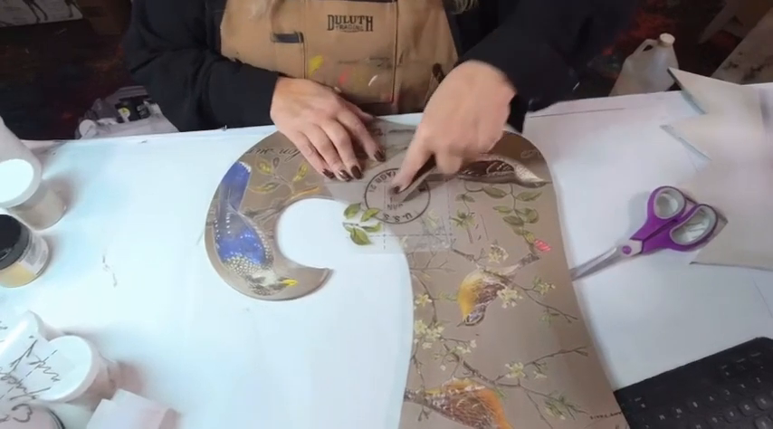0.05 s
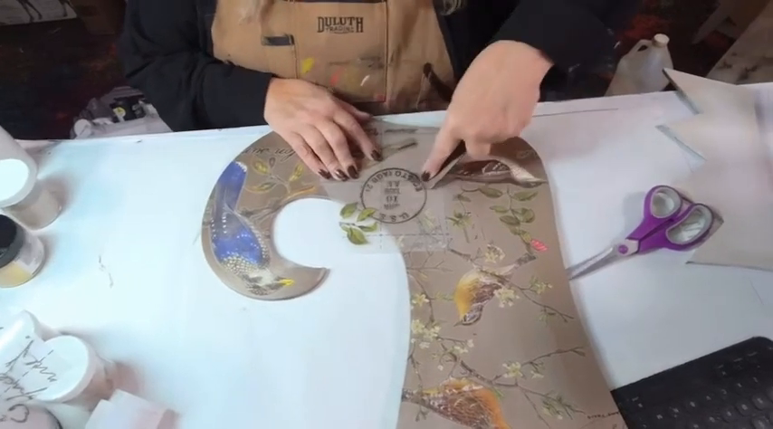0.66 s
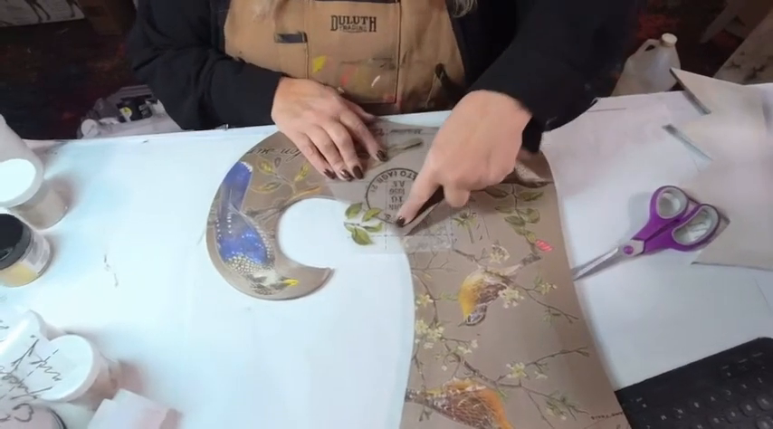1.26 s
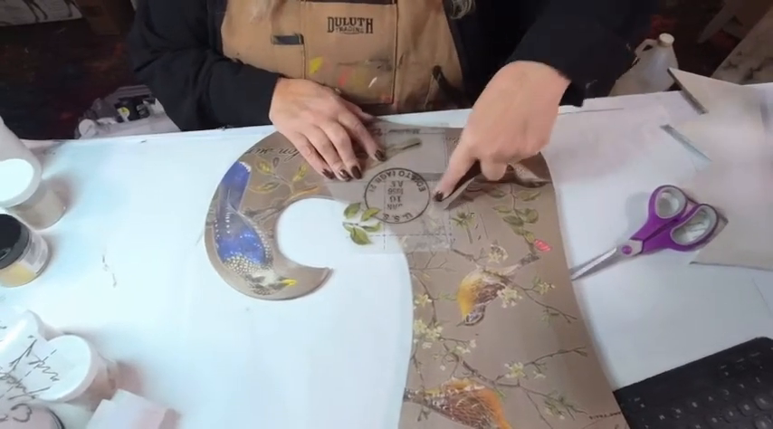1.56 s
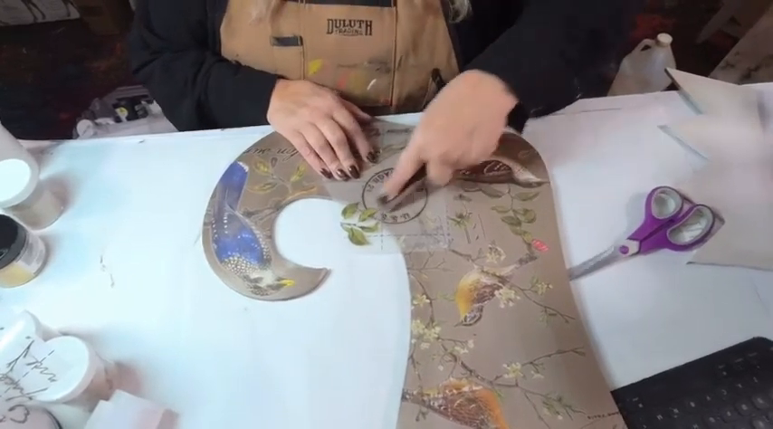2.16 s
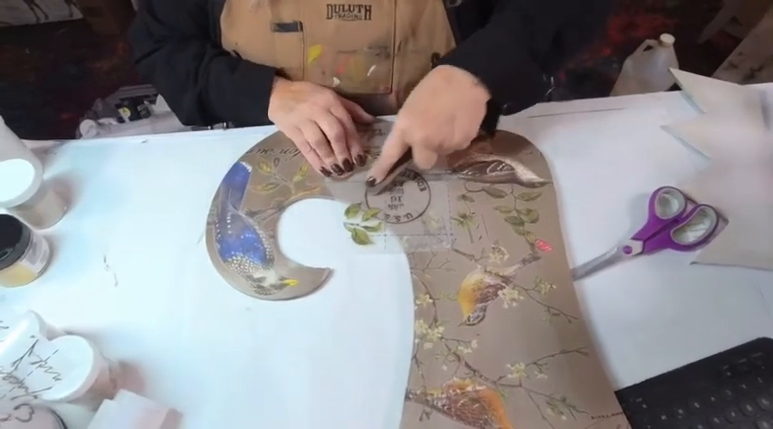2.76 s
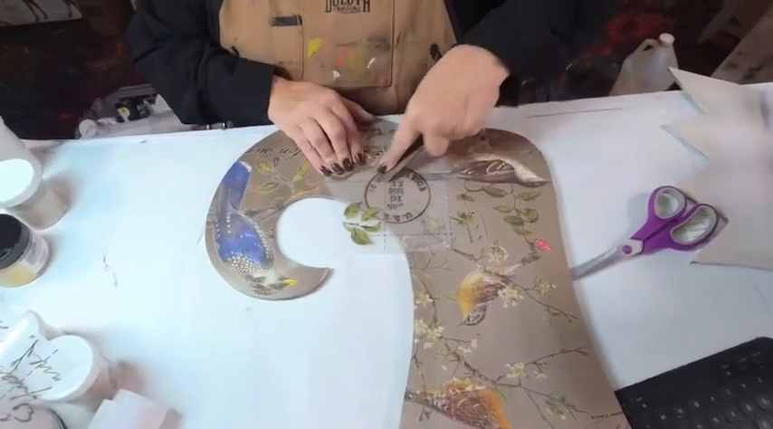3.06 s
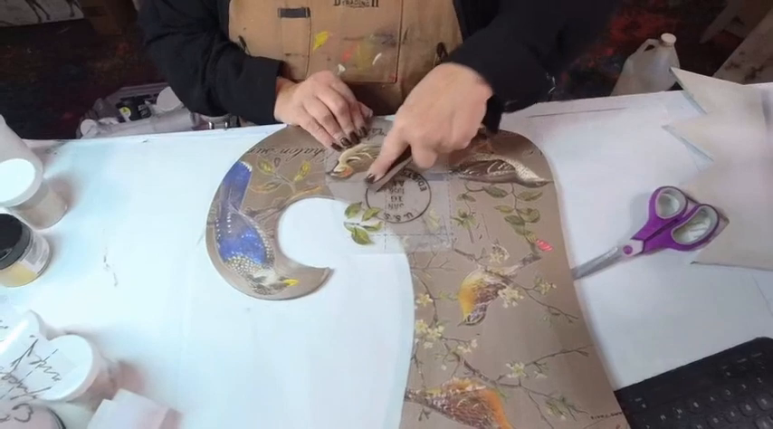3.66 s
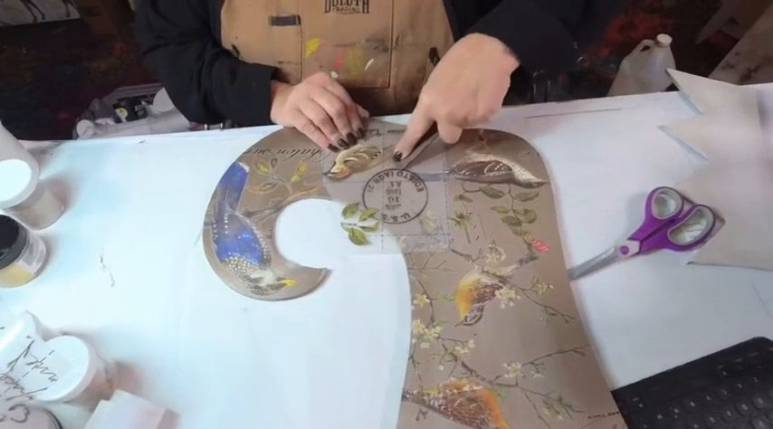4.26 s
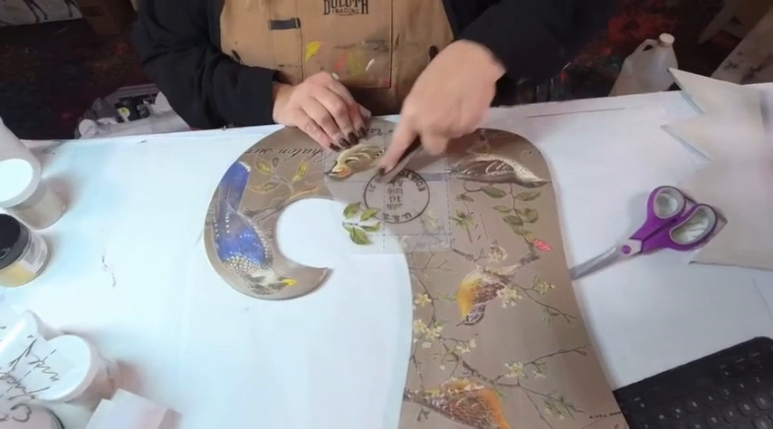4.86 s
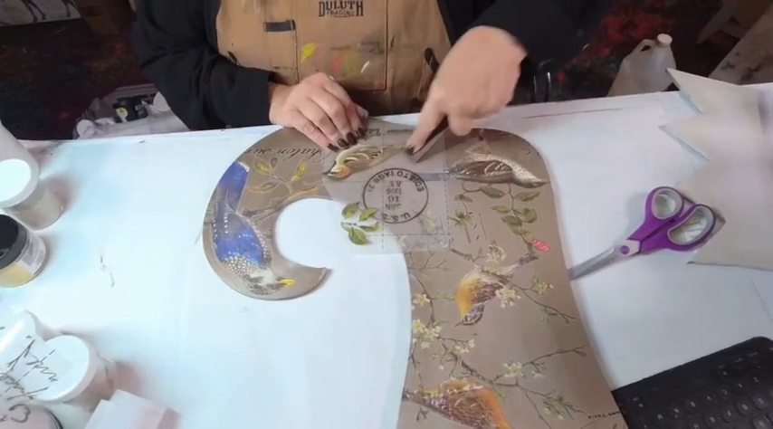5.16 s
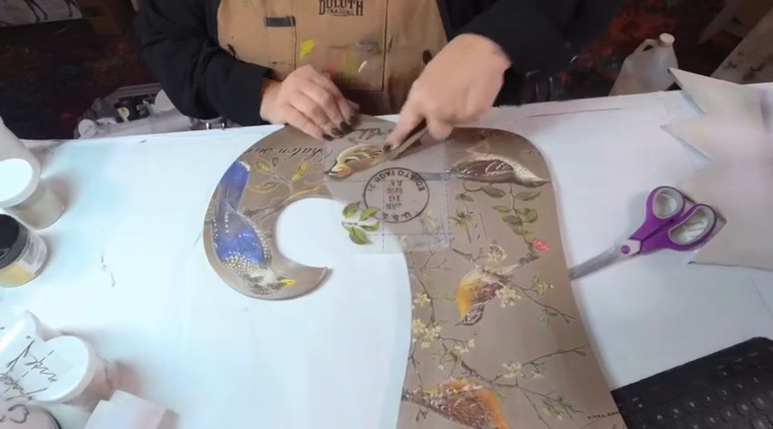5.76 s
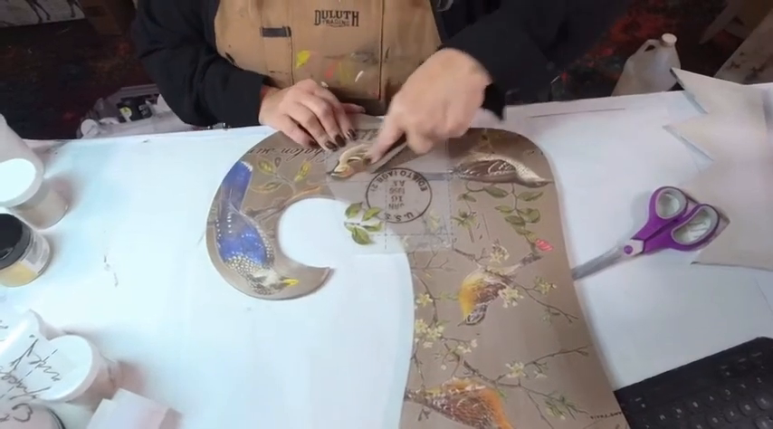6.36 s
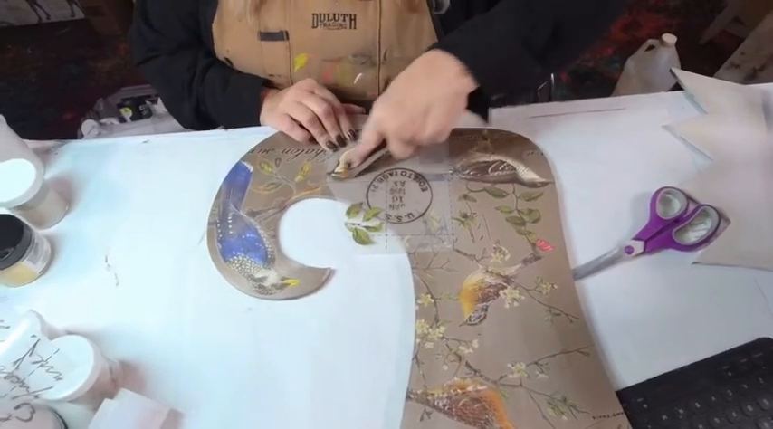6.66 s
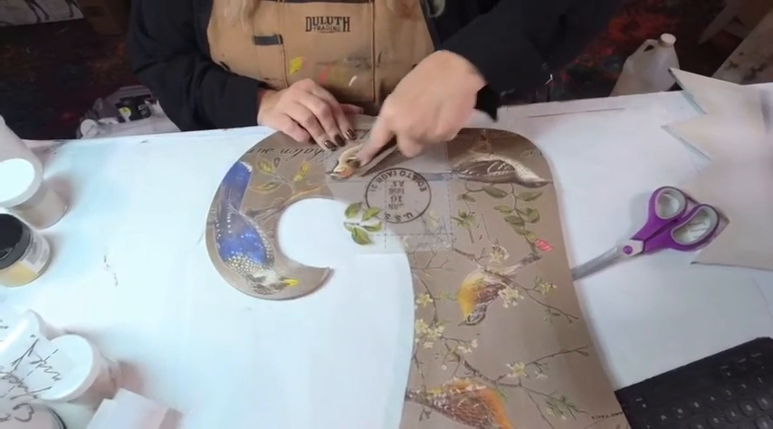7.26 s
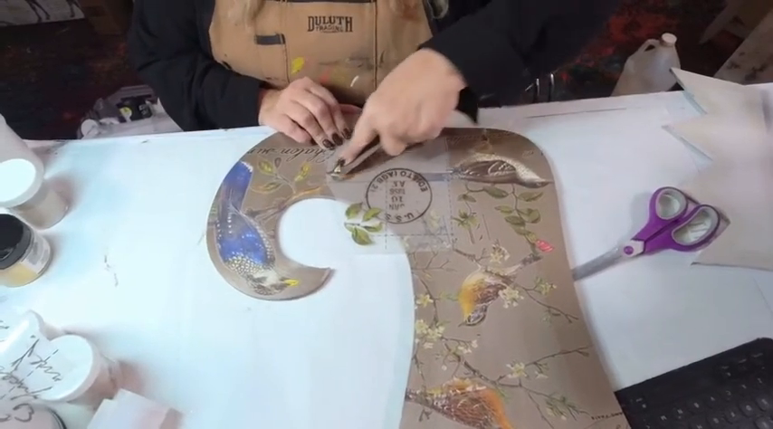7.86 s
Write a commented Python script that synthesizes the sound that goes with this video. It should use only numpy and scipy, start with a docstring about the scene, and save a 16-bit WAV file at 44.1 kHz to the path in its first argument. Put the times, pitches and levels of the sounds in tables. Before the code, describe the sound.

A small stick rubs a plastic sheet against a thin wooden board for the whole eight seconds, back and forth at about four strokes a second, slowing slightly after 5 seconds. Each stroke is a soft, bright, scratchy hiss with a rasp underneath. During the first two seconds the board also drums dully under the pressure. From about 1.7 to 1.9 seconds the sheet buckles in a cluster of crackles and sharp snaps, the loudest moment. The rubbing continues a little lighter, with faint ticks and small wooden taps, then firmer hissing strokes come around 5.4 and 6 seconds. Near 6.9 seconds the sheet crunches again with a sharp snap and a hollow pop, and the strokes carry on to the end. The sound is close and centred, in a small room with short reflections and a steady low ventilation hum.

```python
"""Burnishing a transfer sheet

A small stick rubs a plastic sheet onto a thin wooden board, back and forth, four strokes a second.
Stick-slip friction hisses on the film and drives the board's resonances, which rasp and drum.
Now and then the sheet buckles, and it crackles, snaps or pops.
A small room reflects these sounds, over a low steady hum."""
import sys
import numpy as np
from scipy import signal
from scipy.fft import rfft, irfft, next_fast_len
from scipy.io import wavfile
from scipy.ndimage import uniform_filter1d, map_coordinates

SR = 44100
rng = np.random.default_rng(int(sys.argv[2]) if len(sys.argv) > 2 else 0)


def output_pcm(signal):
    """Save a mono or channel-first signal as 16-bit PCM at the path in sys.argv[1].

    Samples are clipped to [-1, 1] before scaling.
    """
    pcm = np.clip(np.atleast_2d(signal).T, -1, 1) * 32767
    wavfile.write(sys.argv[1], SR, np.round(pcm).astype(np.int16))


N = 353682
TIME = np.arange(N) / SR

# The film's bright hiss. Each row: frequency in Hz, spectral density in dB.
HISS = [(3000, -40), (6500, -9.5), (7700, -4.5), (8500, 1.5), (9600, 0), (11000, 3), (13000, -1.5),
        (14500, -5.5), (15800, -25.5)]


def amp(db):
    """Amplitude ratio of a level in decibels."""
    return 10 ** (np.asarray(db) / 20)


def unit(x):
    """Normalisation to an rms of 1."""
    return x / np.sqrt(np.mean(x ** 2) + 1e-20)


def along(points, hz):
    """Interpolation of (Hz, value) points on a logarithmic frequency axis."""
    f, v = np.transpose(points)
    return np.interp(np.log(hz + 1), np.log(f + 1), v)


def curve(points):
    """Linear interpolation of (seconds, value) points, one value per sample."""
    return np.interp(TIME, *np.transpose(points))


def wobble(rate):
    """Smooth random modulation: a spline through rate knots a second."""
    return map_coordinates(rng.standard_normal(int(N * rate / SR) + 4), [TIME * rate])


def filtered(x, response):
    """Linear filtering: the spectrum of x times a frequency response."""
    size = next_fast_len(N + SR // 2)
    return irfft(rfft(x, size) * response(np.fft.rfftfreq(size, 1 / SR)), size)[..., :N]


def coloured(x, spectrum, size=16384):
    """Minimum-phase filtering: x excites a causal response of this spectrum and unit energy."""
    cepstrum = irfft(np.log(amp(along(spectrum, np.fft.rfftfreq(size, 1 / SR)))))
    cepstrum[1:size // 2] *= 2
    cepstrum[size // 2 + 1:] = 0
    ring = irfft(np.exp(rfft(cepstrum)))
    return signal.fftconvolve(x, ring / np.linalg.norm(ring))[:N]


def gliding(x, stretch):
    """Resampling multiplies every frequency of x by the factor stretch."""
    return map_coordinates(x, [np.cumsum(stretch)], order=1, mode="mirror")


def slips(rate, spread_db):
    """Stick-slip excitation: random impulses of uneven size, rate a second, at steady power."""
    jolts = (rng.random(N) < rate / SR) * rng.standard_normal(N) / np.sqrt(rate)
    return unit(jolts * amp(spread_db * rng.standard_normal(N)))


def wandering(x, stretch, depth_db, spacing_hz, rate):
    """A moving contact: each spot favours other frequencies, which glide by the factor stretch."""
    hz, t, spectra = signal.stft(x, SR, nperseg=1024)
    field = rng.standard_normal((400, 200))
    place = np.broadcast_arrays(hz[:, None] / (spacing_hz * np.interp(t, TIME, stretch)), t * rate)
    colour = amp(depth_db * map_coordinates(field, place, order=1, mode="mirror"))
    power = np.mean(np.abs(spectra) ** 2, axis=1)
    colour /= np.sqrt(power @ colour ** 2 / power.sum())  # the colour moves, the power stays
    return unit(signal.istft(spectra * colour, SR, nperseg=1024)[1][:N])


def through_board(x, direct):
    """Forced vibration: the board rings in its modes and passes the share direct straight on."""
    # The board's modes. Each row: frequency in Hz, bandwidth in Hz, peak gain in dB.
    modes = [(297.7, 10.5, 10.5), (359.3, 18, 3.5), (427, 3.6, 12.5), (559.3, 34, 4), (627, 72, -3.5),
             (725, 51, -1), (843, 75, -1.5), (994, 98, -7), (1014, 210, -6.5), (1260, 45, -2.5),
             (1548, 25, -24.5), (1770, 22, -11)]
    resonance = lambda f, hz, width: 1j * f * width / (hz * hz - f * f + 1j * f * width)
    response = lambda f: direct + sum(amp(db) * resonance(f, hz, width) for hz, width, db in modes)
    return filtered(x, response)


def rubbing():
    """Sliding friction: speed drives the hiss, pressure the board. Returns tip sound and drumming."""
    # Pull and push in turn. Each row: start and end in seconds, force in dB, drumming in dB,
    # place of the pressure crest along the stroke from 0 to 1.
    strokes = [(0, 0.18, -0.5, -3, 0.64), (0.219, 0.43, 4, 9.5, 0.52), (0.441, 0.637, 1.5, 2, 0.53),
               (0.669, 0.873, 0.5, 15, 0.58), (0.883, 1.094, -3, 0, 0.41), (1.093, 1.308, -2, 11.5, 0.54),
               (1.316, 1.508, -3, 2.5, 0.54), (1.553, 1.829, 2, 11, 0.41), (1.81, 2.045, -4, 1.5, 0.34),
               (2.053, 2.287, -1.5, 2, 0.59), (2.278, 2.5, -1.5, -11, 0.34), (2.538, 2.699, -3, -7, 0.58),
               (2.737, 2.92, -4, -8, 0.83), (2.975, 3.169, 1, 0, 0.41), (3.162, 3.411, 1, 1.5, 0.89),
               (3.404, 3.618, 0, 4.5, 0.35), (3.614, 3.819, -4, -5, 0.73), (3.848, 4.074, -1, 4, 0.48),
               (4.086, 4.293, -5, -0.5, 1), (4.315, 4.528, -0.5, 1.5, 0.42), (4.52, 4.742, -6.5, -6, 0.54),
               (4.769, 4.97, 0.5, 5.5, 0.4), (4.96, 5.327, -3, 4, 0.97), (5.32, 5.589, 5.5, -2, 0.39),
               (5.617, 5.889, 0, -3, 0.83), (5.927, 6.215, 4.5, 1, 0.36), (6.245, 6.509, 1, -24, 0.22),
               (6.536, 6.78, 3.5, -0.5, 0.35), (6.823, 7.084, -2, 0.5, 0.07),
               (7.145, 7.381, -1.5, -27, 0.43), (7.425, 7.674, -3.5, -8, 0.85), (7.699, 7.931, 5, -2, 0.42),
               (7.96, 8.21, -6, -1, 0.72)]
    # Friction spectra of film and board. Each row: frequency in Hz, spectral density in dB.
    film_spectrum = [(3000, -35), (4400, -12), (4950, -1.5), (5250, 1), (5650, -5), (6400, -11), (7500, -6),
                     (10000, -30)]
    scrape_spectrum = [(1300, -18), (1800, -9.5), (2350, -7.5), (2850, 3.5), (3400, 0), (3900, 2),
                       (4500, 1.5), (5400, -6.5), (8000, -38)]
    rasp_spectrum = [(400, -22.5), (700, -0.5), (900, 1.5), (1300, -4), (1600, -6.5), (2000, -4.5),
                     (3200, -23), (6000, -40)]
    drum_spectrum = [(100, -39), (200, 8), (300, 1), (560, 1), (700, -8.5), (1100, -22.5), (3000, -106)]
    # How coarse the surface is, and how freely the film rings. Each row: time in seconds, level in dB.
    coarseness = [(.3, 3), (1, 3), (1.9, 5.5), (2.2, 3.5), (2.65, 3), (3.05, -1.5), (3.33, 3.5), (3.6, -3),
                  (4.45, -3), (5.4, 1.5), (6.1, 0.5), (8, 1)]
    sheen = [(.3, 1), (.75, -2), (1, 4.5), (1.5, -6), (2.2, 1), (3, 2.5), (3.6, 0.5), (4.5, 1.5),
             (5.4, -1.5), (7.8, 1)]
    # The rasp's pitch at the spot being rubbed. Each row: time in seconds, frequency factor.
    rasp_pitch = [(0, 1.046), (1.3, 0.91), (2.2, 0.95), (3.3, 1.205), (4.2, 1.13), (5.4, 1.25), (6.1, 1.14),
                  (8, 1.16)]

    stroke = np.maximum(np.searchsorted(np.array(strokes)[:, 0], TIME) - 1, 0)
    start, end, force_db, board_db, crest = np.array(strokes)[stroke].T
    push = 2 * (stroke % 2) - 1  # +1 on a push, -1 on a pull
    phase = np.clip((TIME - start) / (end - start), 0, 1)
    speed = 0.0087 + np.tanh(1.9 * np.abs(np.sin(np.pi * phase)) ** 1.3)  # almost still at the turns
    speed_db = 20 * np.log10(speed)
    swell_db = 12 * np.tanh((crest - 0.38) / 0.17)  # a late crest swells the hiss, an early one fades it
    drive_db = speed_db + swell_db * (phase - .5)
    pressure_db = lambda peak: 0.43 * speed_db - 13 * (1 - np.exp(-((phase - peak) / 0.32) ** 2))
    coarse_db = curve(coarseness)
    hiss_db = -56 + force_db + drive_db
    film_db = -66.5 + force_db + 2.5 * push + curve(sheen) + drive_db
    scrape_db = -69 + 1.45 * force_db + coarse_db + drive_db
    rasp_db = -57.5 + force_db + 0.42 * board_db + 0.94 * coarse_db + pressure_db(crest)
    drum_db = -51.5 + board_db + pressure_db(crest + 0.11)  # peaks after the rasp: the stroke darkens

    stretch = 1 - .11 * push * (phase - .5)  # resonances sink along a push and rise along a pull
    friction = lambda spectrum: coloured(slips(2500 + 12000 * speed, spread_db=1.2), spectrum)
    hiss = wandering(friction(HISS), stretch ** .5, depth_db=5, spacing_hz=260, rate=18)
    film = wandering(friction(film_spectrum), stretch ** .3, depth_db=6, spacing_hz=190, rate=12)
    scrape = wandering(friction(scrape_spectrum), stretch, depth_db=8.5, spacing_hz=190, rate=11)
    rasp = gliding(friction(rasp_spectrum), curve(rasp_pitch) * stretch ** 2)
    rasp = through_board(rasp, direct=0.079)
    rasp = wandering(rasp, stretch, depth_db=9, spacing_hz=90.55, rate=13)
    drum = through_board(friction(drum_spectrum), direct=0.17)
    drum = wandering(drum, stretch, depth_db=7, spacing_hz=59.9, rate=16)

    grain_db = wobble(40) + 0.17 * wobble(270)  # the paint is not quite smooth
    gain = lambda db: uniform_filter1d(amp(db), size=500)
    tip = gain(hiss_db) * hiss + gain(film_db) * film + gain(scrape_db) * scrape + gain(rasp_db) * rasp
    return tip * amp(grain_db), gain(drum_db) * drum


def background():
    """Ambient noise: ventilation rumble, mains hum and faint room noise in antiphase at the ears."""
    # The rumble's strength. Each row: time in seconds, level in dB.
    rumble_levels = [(0, -44), (1.2, -46.5), (3.6, -48), (4.8, -50), (5.7, -49.5), (6.6, -46.5), (8, -49.5)]
    # Ventilation and room noise. Each row: frequency in Hz, spectral density in dB.
    rumble_spectrum = [(20, -45.5), (31, -32.5), (41, -10.5), (49, -30.5), (64, -9.5), (85, -3), (100, -2),
                       (116, 6), (135, -8.5), (157, 1), (175, -8.5), (230, -20), (500, -19.5), (900, -44.5),
                       (3000, -48.5), (12000, -52.5)]
    diffuse_spectrum = [(30, -11), (150, -12), (500, 4), (1400, -7), (3000, -5.5), (5500, -9.5),
                        (9000, -55)]
    rumble = amp(curve(rumble_levels)) * unit(coloured(rng.standard_normal(N), rumble_spectrum))
    mains = amp(-59 + 1.7 * wobble(5.3)) * np.sin(2 * np.pi * 120 * TIME)
    diffuse = amp(-83.5) * unit(coloured(rng.standard_normal(N), diffuse_spectrum))
    return rumble + mains + np.array([diffuse, -diffuse])


def snags():
    """Buckling: the tip catches and crumples the sheet, a dull crunch with bright crackle on top."""
    # The catches. Each row: start and end in seconds, level in dB.
    catches = [(0.024, 0.126, -70), (0.717, 0.784, -55), (1.704, 1.748, -39), (1.764, 1.79, -48.5),
               (1.81, 1.862, -50.5), (1.854, 1.899, -48.5), (2.175, 2.273, -64), (2.328, 2.362, -58.5),
               (3.234, 3.255, -53.5), (3.352, 3.386, -57), (4.815, 4.86, -61.5), (5.383, 5.47, -60.5),
               (5.793, 5.833, -58.5), (6.837, 6.886, -37), (6.875, 6.894, -40)]
    # The crunch. Each row: frequency in Hz, spectral density in dB.
    crunch_spectrum = [(300, -16.5), (900, 4), (1300, -2.5), (1700, 6), (2150, 2.5), (2900, 6.5), (4400, 2),
                       (5900, 2), (8000, 3.5), (14000, -33)]
    gate = lambda start, end: np.clip(np.minimum(TIME - start, end - TIME) / .008, 0, 1)
    envelope = sum(amp(db) * gate(start, end) for start, end, db in catches)
    buckling = lambda spectrum: unit(coloured(slips(3600, spread_db=2.5), spectrum))
    return envelope * (buckling(crunch_spectrum) + amp(-3.5) * buckling(HISS))


def snaps_and_taps():
    """Impulsive excitation: each blow cracks the film and leaves the board's modes to decay freely."""
    # The sheet snaps. Each row: time in seconds, level in dB, thin tick relative to the snap in dB.
    sheet_snaps = [(0.046, -33.5, 1), (0.112, -38.5, 9), (0.7601, -34.5, 10), (0.7646, -37, 10),
                   (1.715, -27, -16), (1.772, -8.5, -15), (1.842, -26.5, 0), (1.8627, -4, -5),
                   (1.917, -38, 12), (2.18, -40, 7), (2.34, -30, -15), (5.258, -40.5, 5.5),
                   (5.382, -35.5, 14.5), (6.2616, -45, 14), (6.2657, -33, 18.5), (6.845, -26, 4),
                   (6.854, -15.5, -18), (6.871, -22, -10), (7.617, -39, 6)]
    # The tip bumps the board. Each row: time in seconds, level in dB, offset of the crack in dB.
    tip_taps = [(1.747, -17, -10), (3.017, -35, -16), (3.201, -41.5, -2.5), (3.923, -33.5, -3),
                (4.819, -38.5, -7), (5.401, -31.5, -1.5), (5.971, -38, -6), (6.735, -32.5, -11.5),
                (7.619, -33.5, -3)]
    # The struck board's modes. Each row: frequency in Hz, level in dB, 60 dB decay time in seconds.
    modes = [(305, -23, 0.047), (435, -21, 0.065), (555, -18.5, .03), (860, -1, 0.04), (960, -6, 0.042),
             (1076, -8, 0.037), (1296, -8.5, 0.033), (1430, -9.5, 0.0079)]
    # The snapping film. Each row: frequency in Hz, spectral density in dB.
    snap_spectrum = [(500, -16), (1400, -15.5), (2200, 2), (2900, -2.5), (4000, -5), (4700, 1.5),
                     (5250, 9.5), (7500, 2), (8700, -0.5), (10200, 3.5), (15000, -28.5)]
    crack_t60_s, knock_rise_s = .009, 0.00075
    t = np.arange(SR // 8) / SR
    ticks, snaps, knocks = np.zeros((3, N + len(t)))
    blows = [(start, db + thin_db, db, db - 23.5) for start, db, thin_db in sheet_snaps]
    blows += [(start, db + crack_db, db + crack_db, db) for start, db, crack_db in tip_taps]
    for start, tick_db, snap_db, knock_db in blows:
        crack = rng.standard_normal((2, len(t))) * amp(-60 * t / crack_t60_s)
        crack *= 2.08 / np.linalg.norm(crack, axis=1, keepdims=True)
        detuning = 1 + .02 * rng.standard_normal(len(modes))  # each spot rings a little differently
        ring = sum(amp(db - 60 * t / t60) * np.sin(2 * np.pi * hz * shift * t)
                   for (hz, db, t60), shift in zip(modes, detuning))
        span = slice(round(start * SR), round(start * SR) + len(t))
        ticks[span] += amp(tick_db) * crack[0]
        snaps[span] += amp(snap_db) * crack[1]
        knocks[span] += 0.57 * amp(knock_db) * ring * (1 - np.exp(-t / knock_rise_s))
    return coloured(ticks[:N], HISS) + coloured(snaps[:N], snap_spectrum) + knocks[:N]


def sweep(start, end, first_hz, last_hz, db, width_hz, slips_per_s):
    """A driven resonance: random slips excite one band, which swells and fades as its centre glides."""
    count = round((end - start) * SR)
    carrier = np.exp(2j * np.pi * np.cumsum(np.geomspace(first_hz, last_hz, count)) / SR)
    jolts = rng.standard_normal(count) * (rng.random(count) < slips_per_s / SR)
    lowpass = signal.butter(2, width_hz / 2, fs=SR)
    ring = np.real(carrier * signal.lfilter(*lowpass, jolts / carrier))  # a band around the carrier
    swell = np.sin(np.linspace(0, np.pi, count))
    out = np.zeros(N)
    out[round(start * SR):][:count] = amp(db) * swell * unit(ring)
    return out


def swishes():
    """Local resonance: each loose patch of film half whistles under the tip at its own pitch."""
    # The patches. Each row: start and end in seconds, first and last frequency in Hz, level in dB.
    patches = [(0.069, 0.17, 2600, 2950, -60.5), (0.217, 0.347, 3800, 3700, -56.5),
               (0.222, 0.348, 3000, 2600, -56), (0.529, 0.627, 2570, 2800, -60.5),
               (0.659, 0.782, 3360, 3950, -61), (2.17, 2.282, 3600, 3700, -62),
               (2.589, 2.685, 4490, 3830, -64), (2.85, 2.92, 2930, 2950, -68.5),
               (2.987, 3.097, 2760, 2400, -65), (3.193, 3.226, 3270, 3280, -59),
               (3.236, 3.33, 3590, 3600, -67), (3.343, 3.395, 3350, 3250, -59.5),
               (3.45, 3.528, 2980, 2770, -66), (3.871, 4.014, 2970, 2570, -64.5),
               (5.359, 5.519, 2946, 2500, -62), (6.042, 6.215, 3670, 3360, -65),
               (6.28, 6.474, 3980, 3237, -81), (6.526, 6.652, 4470, 4900, -60),
               (6.615, 6.76, 3886, 3300, -60.5), (7.138, 7.247, 4960, 4650, -65),
               (7.213, 7.384, 3950, 3460, -66), (7.465, 7.602, 3440, 3500, -75),
               (7.698, 7.802, 4600, 5170, -58), (7.707, 7.914, 2546, 3285, -62.5),
               (5.969, 6.117, 2130, 1918, -65), (6.56, 6.68, 2110, 2000, -70)]
    return sum(sweep(*patch, width_hz=350, slips_per_s=3000) for patch in patches)


def bites():
    """Coarse stick-slip: the tip digs in and grates in two resonances that fall as it slows."""
    # The tip digs in. Each row: start and end in seconds, level in dB.
    digs = [(0.248, 0.367, -49.5), (0.71, .82, -47), (1.14, 1.243, -61), (1.62, 1.73, -46.5),
            (2.146, 2.207, -48.5), (3.331, 3.399, -52.5), (3.44, 3.517, -59), (4.66, 4.728, -66.5),
            (4.806, 4.873, -55), (5.37, 5.48, -50), (5.947, 6.105, -55), (6.404, 6.466, -63),
            (6.559, 6.65, -59), (7.77, 7.87, -58.5)]
    # The grating resonances. Each row: starting frequency in Hz, relative level in dB.
    modes = [(1000, 0), (1480, -4)]
    return sum(sweep(start, end, hz, hz * 0.79, db + mode_db, width_hz=480, slips_per_s=900)
               for start, end, db in digs for hz, mode_db in modes)


def whistles(hz=5230):
    """Narrow-band resonance: now and then the film's own ring builds up and dies away."""
    # The film rings. Each row: start and end in seconds, level in dB.
    rings = [(0.885, 1.074, -68.5), (1.196, 1.312, -64), (1.315, 1.452, -68.5), (1.64, 1.76, -54),
             (3.418, 3.502, -66.5), (3.978, 4.07, -69), (4.51, 4.644, -76), (4.655, 4.77, -68),
             (4.771, 4.86, -62)]
    return sum(sweep(start, end, hz, hz, db, width_hz=290, slips_per_s=3000) for start, end, db in rings)


def groans():
    """Friction under load: the board shudders in a low resonance when the hand leans on it."""
    # The hand leans. Each row: start and end in seconds, frequency in Hz, level in dB.
    leans = [(1.613, 1.701, 448, -48.5), (2.019, 2.193, 476.5, -50.5), (4.976, 5.128, 399, -60.5),
             (5.93, 6.049, 408, -46.5), (6.723, 6.778, 375, -46.5)]
    return sum(sweep(start, end, hz, hz, db, width_hz=235, slips_per_s=900)
               for start, end, hz, db in leans)


def pops():
    """Snap-through buckling: a bulge in the sheet flips, one impulse into a short, hollow ring."""
    # The flips. Each row: time in seconds, level in dB.
    flips = [(1.7202, -15), (6.8774, -6)]
    # The bulge's ring. Each row: frequency in Hz, spectral density in dB.
    bulge_spectrum = [(300, -22), (900, 0), (1250, -6), (1700, 2), (2050, 6.5), (2700, -3), (4000, -15),
                      (12000, -29.5)]
    impulses = np.zeros(N)
    for start, db in flips:
        impulses[round(start * SR)] = amp(db)
    return coloured(impulses, bulge_spectrum)


def room(x, early_db, late_db):
    """Reverberation: early reflections from near surfaces, then a short tail. Returns mid and side."""
    # The room's decay. Each row: frequency in Hz, reverberation time in seconds.
    decay_times = [(200, 0.047), (1000, 0.18), (5000, 0.17), (14000, 0.17)]
    hz, t, spectra = signal.stft(rng.standard_normal((2, SR // 2)), SR, nperseg=256)
    decay = amp(-60 * t / along(decay_times, hz)[:, None])
    tail = signal.istft(spectra * decay, SR, nperseg=256)[1]
    t = np.arange(tail.shape[1]) / SR
    early = rng.standard_normal(tail.shape) * (rng.random(tail.shape) < .05) * amp(-60 * t / 0.022)
    response = sum(amp(db) * part / np.linalg.norm(part, axis=1, keepdims=True)
                   for db, part in ((early_db, early * (t > .002)), (late_db, tail * (t > .006))))
    return signal.fftconvolve(x[None], response, axes=1)[:, :N]


def scene():
    """Superposition: stick, sheet and board are central; reflections add width, most to the snaps."""
    # Stereo spread of the reflections. Each row: frequency in Hz, side gain in dB.
    tip_width = [(100, -24.5), (500, -16.5), (1200, -13.5), (2500, -1), (5000, -16.5), (8000, -31.5),
                 (12000, -37.5)]
    snap_width = [(250, -17), (500, -19), (1000, -15), (2200, -7), (5000, -9), (8000, -14), (12000, -17)]
    tip, drum = rubbing()
    tip = tip + bites() + swishes() + whistles()
    snaps = snags() + snaps_and_taps() + pops()
    tip_room, tip_side = room(tip, early_db=-28, late_db=-8)
    snap_room, snap_side = room(snaps, early_db=-8.5, late_db=-7)
    spread = lambda x, width: filtered(x, lambda hz: amp(along(width, hz)))
    side = spread(tip_side, tip_width) + spread(snap_side, snap_width)
    mid = tip + drum + groans() + snaps + tip_room + snap_room
    return np.array([mid + side, mid - side]) + background()


def record(dry):
    """Band limiting: a steep low-pass filter removes the highest treble."""
    cutoff_hz = 15800
    return filtered(dry, lambda hz: 1 / (1 + (hz / cutoff_hz) ** 120))


dry = scene()
out = record(dry)
output_pcm(out)
```